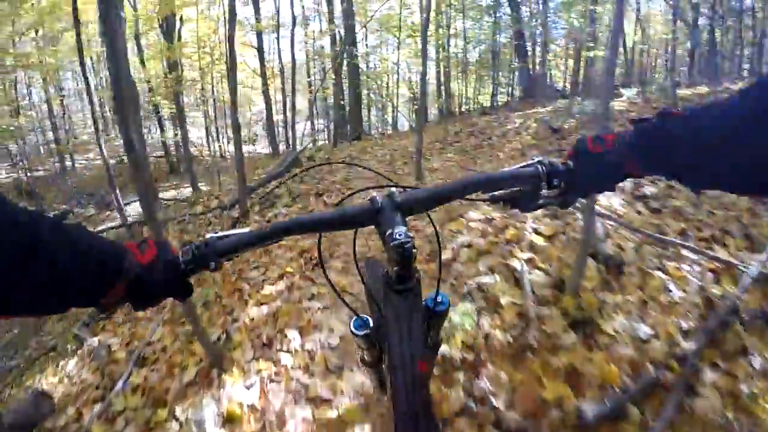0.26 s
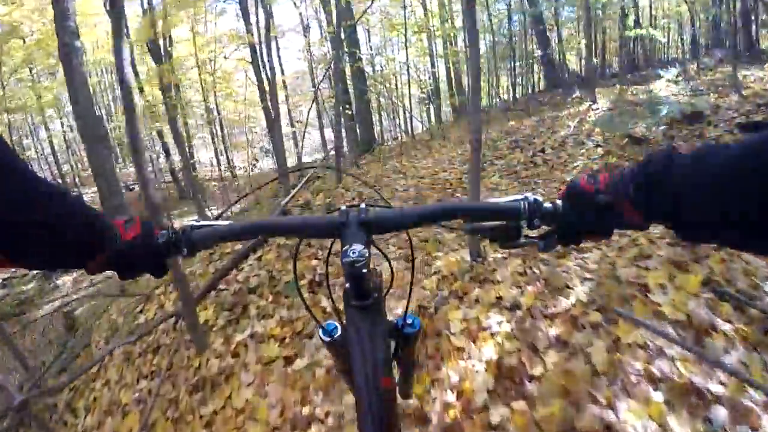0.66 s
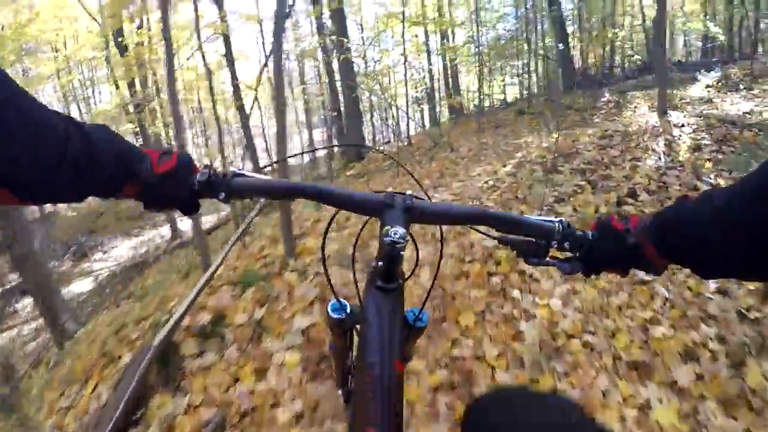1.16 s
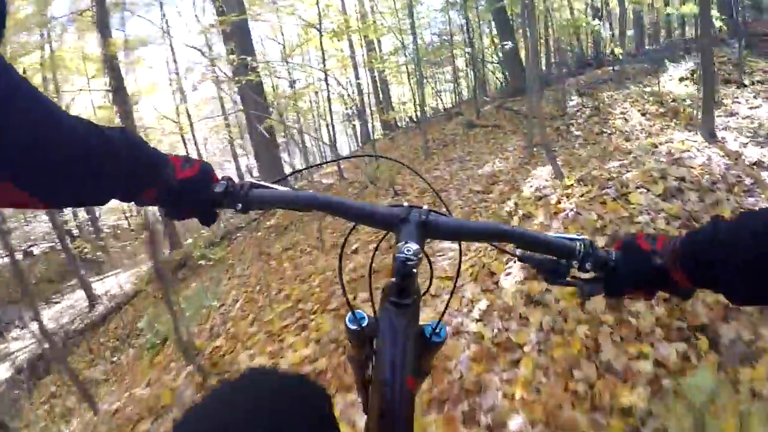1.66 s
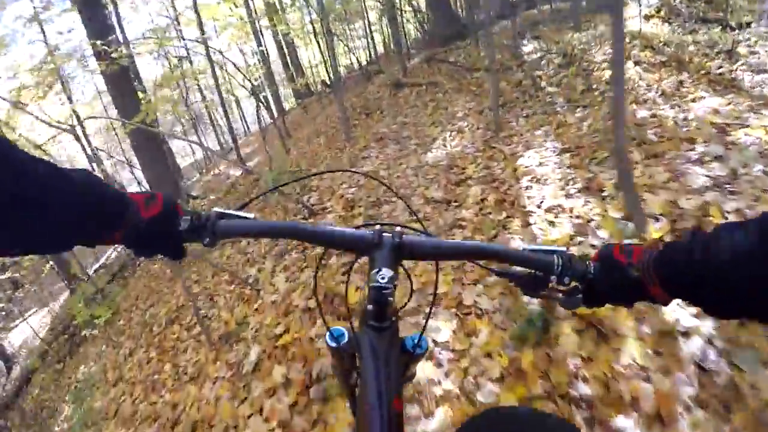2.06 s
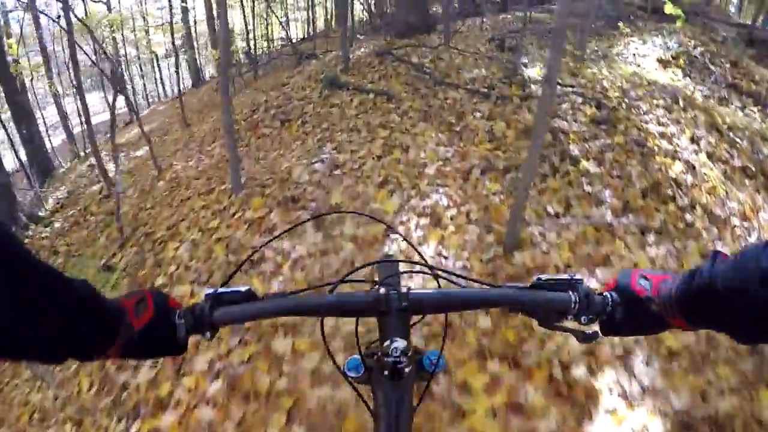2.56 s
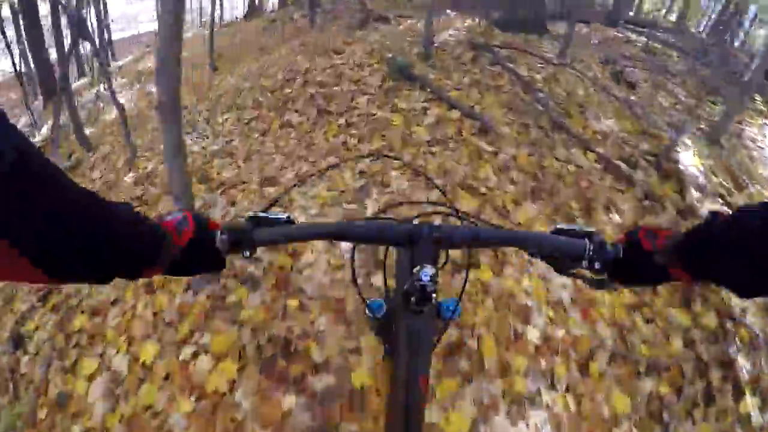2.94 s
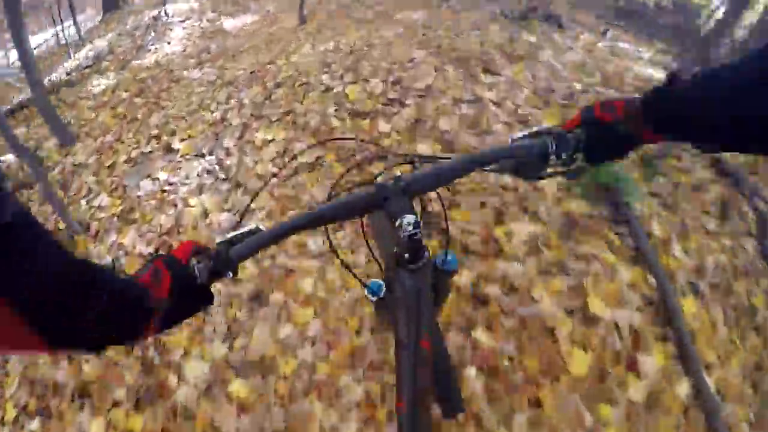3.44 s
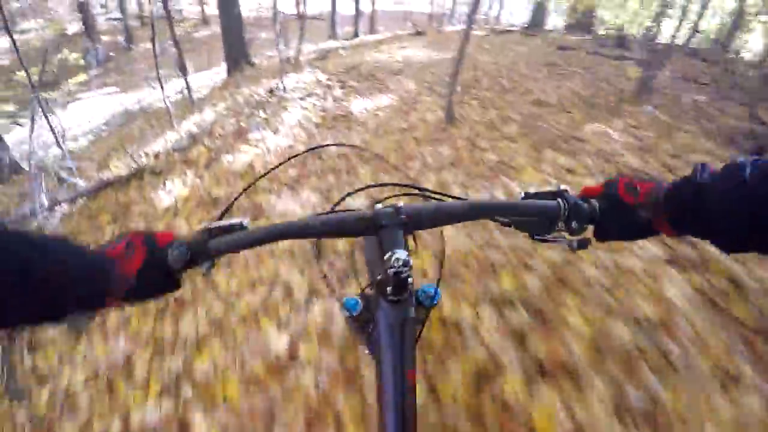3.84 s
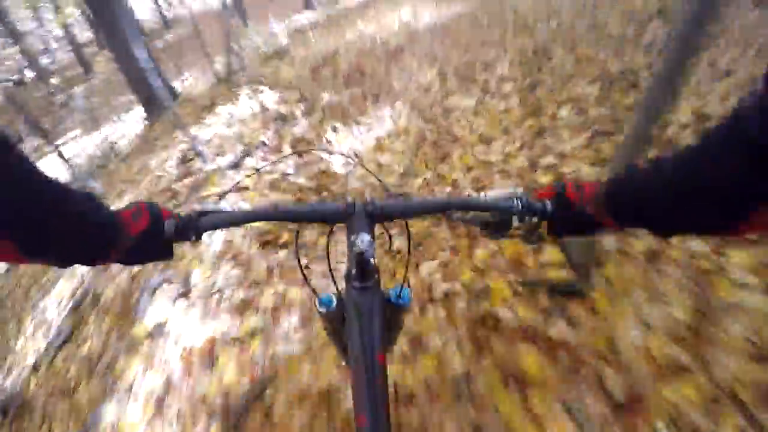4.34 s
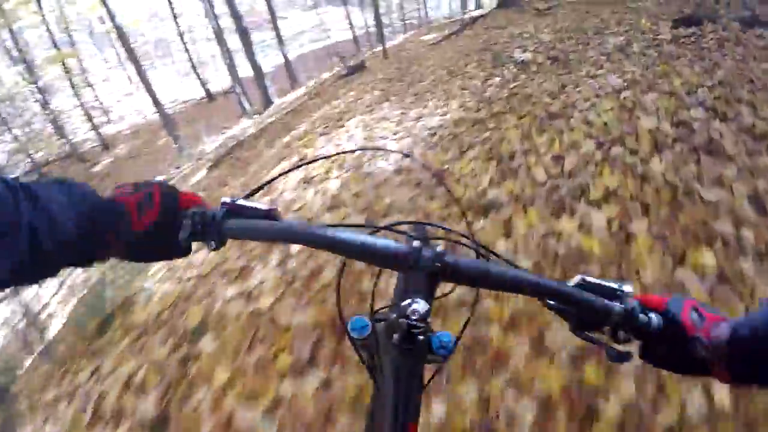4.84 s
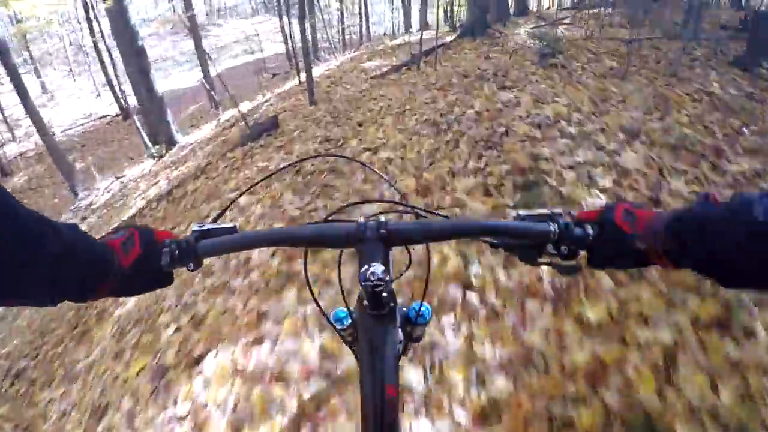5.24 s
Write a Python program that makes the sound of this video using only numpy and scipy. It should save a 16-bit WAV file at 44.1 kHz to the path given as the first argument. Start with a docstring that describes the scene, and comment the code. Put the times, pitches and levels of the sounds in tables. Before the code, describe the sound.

A mountain bike rides fast over dry leaves, tyres crackling and crunching while low buffeting thumps shake the body-worn microphone.

```python
"""Mountain bike over dry leaves

A mountain bike runs fast over dry leaves, heard by a small camera in a case on the rider's chest.
The case shakes and swings as low noise and slow tones; bumps and frame knocks are fading tones.
Leaves are dense tiny cracks over noise, twigs are quick swings with a noisy tail.
The leaf crush, scuffs and splinters are coloured by the ringing case; a faint rush of air lies behind."""
import sys
import numpy as np
from scipy import signal
from scipy.fft import rfft, irfft
from scipy.io import wavfile
from scipy.ndimage import uniform_filter1d

SR = 44100
rng = np.random.default_rng(int(sys.argv[2]) if len(sys.argv) > 2 else 0)


def put_to_file(sound):
    """Save the sound as 16-bit audio at rate SR, in the file named by the first command-line argument."""
    columns = np.atleast_2d(sound).T  # one column per channel
    safe = np.clip(columns, -1, 1)
    whole_steps = np.round(safe * 32767)
    wavfile.write(sys.argv[1], SR, whole_steps.astype(np.int16))


N = 242550


def gain_of(db):
    """Turns decibels into a factor on the waveform."""
    return 10 ** (np.asarray(db) / 20)


def evened(x):
    """Scales a sound to an rms of 1."""
    return x / np.sqrt(np.mean(x ** 2) + 1e-20)


def white_noise():
    """Noise with equal power at every frequency."""
    return rng.standard_normal(N)


def read(points, hz):
    """Reads a spectrum in dB between its points, evenly along pitch."""
    point_hz, level_db = np.transpose(points)
    return np.interp(np.log(hz + 1), np.log(point_hz + 1), level_db)


def curves(rows):
    """Draws each column of a table as a line over the whole scene; the first column is time."""
    times, *columns = np.transpose(rows)
    return [np.interp(np.arange(N) / SR, times, column) for column in columns]


def add(mix, start_s, sound):
    """Lays a short sound into the mix, cut off at the end of the scene."""
    part = mix[round(start_s * SR):][:len(sound)]
    part += sound[:len(part)]


def band_passed(x, low_hz, high_hz):
    """Keeps mostly the sound between two frequencies."""
    return signal.sosfilt(signal.butter(2, [low_hz, high_hz], "band", fs=SR, output="sos"), x)


def low_passed(x, hz):
    """Keeps the sound below a frequency without delaying it."""
    return signal.sosfiltfilt(signal.butter(3, hz, fs=SR, output="sos"), x)


def toned(x, points):
    """Shapes a noise by a spectrum that is silent outside its ends."""
    hz = np.fft.rfftfreq(N, 1 / SR)
    inside = (hz >= points[0][0]) & (hz <= points[-1][0])
    return evened(irfft(rfft(x) * gain_of(read(points, hz)) * inside, N))


def steadied(x, seconds, share):
    """Divides out a share of the slow chance swell of a noise."""
    width = round(seconds * SR)
    power = uniform_filter1d(uniform_filter1d(x ** 2, width), width)
    floor = 0.0084 * power.mean()  # keeps quiet gaps from being blown up
    return evened(x / (abs(power) + floor) ** (share / 2))


def flutter(hz):
    """Slow chance with rms 1: straight lines between random values, hz values a second."""
    steps = rng.standard_normal(round(N / SR * hz) + 2)
    return evened(np.interp(np.arange(N) / SR * hz, np.arange(len(steps)), steps))


def rise_and_fall(t, rise_s):
    """A swell that peaks at 1 after rise_s seconds and then dies away."""
    return t / rise_s * np.exp(1 - t / rise_s)


def following(change_db, share, average_db):
    """Gain of a layer that takes a share of a change in dB around its level on average ground."""
    return gain_of(average_db + share * change_db)


def jolting():
    """The case swings on its strap; jolts swell and fade as bells, and the strap checks wide swings."""
    # jolts that set the case swinging, before the strap checks them:
    # (time of the peak [s], level [dB], swing rate [Hz], length between the points at 1/e of the peak [s])
    jolts = [(0.147, -12.5, 21.3, 0.096), (.26, -19.5, 26.7, 0.05), (0.509, -5, 20.8, 0.042),
             (0.649, -17, 24.5, 0.073), (0.802, -10.5, 20.6, .09), (.991, -16.5, 21.7, 0.19),
             (1.154, -8, 21.4, .1), (1.356, -4.5, 23.9, 0.037), (1.529, -14, 26, 0.056),
             (1.68, -12, 20.3, 0.053), (1.865, -14, 21.3, 0.055), (1.955, -14, 19.6, 0.095),
             (2.078, -12.5, 17.4, 0.073), (2.213, -11, 29.8, 0.11), (2.426, -15, 20.9, 0.062),
             (2.605, -14, 19.3, 0.16), (2.817, -16.5, 23.7, 0.092), (2.975, -11, 21.4, 0.097),
             (3.159, -13, 23.7, 0.049), (3.248, -5, 24.2, 0.074), (3.403, -12, 20, 0.12),
             (3.534, -9.5, 19.1, 0.064), (3.609, -8, 20, 0.053), (3.68, -9, 16.5, 0.071),
             (3.761, -6, 24.3, 0.069), (3.899, -9, 18.67, 0.13), (4.007, -6, 18.4, .05),
             (4.081, -7.5, 18.4, .06), (4.24, -4.5, 25, 0.24), (4.368, -0.5, 24.2, 0.061),
             (4.454, -1.5, 21.1, 0.045), (4.577, -1, 20.2, .08), (4.752, -14.5, 16.8, 0.18),
             (4.851, -9.5, 17, 0.12), (4.98, -10.5, 19.4, 0.16), (5.104, -19, 24.4, 0.051),
             (5.231, -17, 17.2, 0.053), (5.385, -7.5, 16.5, 0.086)]
    strap_limit = 0.85  # widest swing, as a waveform value
    t = np.arange(N) / SR
    peak_s, db, hz, length_s = np.transpose(jolts)
    coarse_t = t[::64]  # the bells are slow, so every 64th sample is enough
    bells = np.exp(-2 * (2 * (coarse_t[:, None] - peak_s) / length_s) ** 2)
    power = (gain_of(2 * db) * bells).sum(axis=1)
    size = np.interp(t, coarse_t, np.sqrt(power))
    wandering_hz = np.interp(t, peak_s, hz) * (1 + 0.082 * flutter(20))
    turns = np.cumsum(wandering_hz) / SR + rng.random()
    swing = size * (np.sin(2 * np.pi * turns) + 0.16 * np.cos(4 * np.pi * turns))
    return swing / (1 + (swing / strap_limit) ** 4) ** (1 / 4)


def shaking():
    """Noise for the case's sway and wobble, lumpy thudding from rough ground, tyre drone, frame rattle."""
    # the ride over time: (time [s], ground roughness [dB], frame rattle [dB], tyre drone [dB])
    ground = [(0.0, -57, -41, -50), (0.14, -56, -56, -52.5), (0.66, -56, -63, -59.5),
              (1.05, -56, -59.5, -55), (1.32, -51, -57, -51), (1.45, -55.5, -56.5, -55),
              (1.79, -56.5, -61.5, -56), (2.3, -56, -58.5, -57.5), (2.73, -58, -63, -55),
              (3.12, -53, -60.5, -58), (3.65, -50.5, -57.5, -51), (3.97, -46, -57, -52),
              (4.14, -51, -62, -51), (4.33, -49, -51, -47.5), (4.53, -49.5, -47.5, -44.5),
              (4.72, -54, -59, -52), (4.9, -50.5, -61, -52), (5.2, -50, -54.5, -48), (5.5, -48.5, -56, -51)]
    # spectra of the five layers, each: (frequency [Hz], level [dB])
    sway_tone, wobble_tone, thud_tone = [(4, -40), (8, -6), (13, 4), (20, -3.5), (26, -18.5), (32, -51)], [(16, -25), (22, 10.5), (28, 4), (35, 7),
                                                            (45, -11), (58, -13.5), (70, -39)], [(35, -48), (50, 3.5),
                                                                                (80, -1.5), (125, -6),
                                                                                (160, -15.5), (200, -31)]
    drone_tone, rattle_tone = [(110, -51), (150, -10.5), (190, -4), (280, -2.5), (400, -13.5), (520, -15.5)], [(400, -11.5), (520, -8.5), (620, -0.5), (700, -0.5),
                                                   (780, -5), (1000, -16), (1300, -12)]
    average_ground_db = -55
    ground_db, rattle_db, drone_db = curves(ground)
    rough_db = ground_db - average_ground_db

    # roots and stones jolt the layers together
    lumps, chatter = flutter(25), flutter(60)
    lumpy_thud = white_noise() * gain_of(2.15 * lumps)
    lumpy_drone = white_noise() * gain_of(0.64 * lumps + 2.0 * chatter)
    lumpy_rattle = white_noise() * gain_of(0.82 * lumps + 2.0 * chatter)

    sway = steadied(toned(white_noise(), sway_tone), 0.15, 0.72)
    wobble = steadied(toned(white_noise(), wobble_tone), 0.01, 1.0)
    thud = steadied(toned(lumpy_thud, thud_tone), 0.17, 0.61)
    drone = steadied(toned(lumpy_drone, drone_tone), 0.058, 0.14)
    rattle = steadied(toned(lumpy_rattle, rattle_tone), 0.39, 0.18)

    mix = following(rough_db, share=0.72, average_db=-27) * sway
    mix += following(rough_db, share=0.5, average_db=-25.5) * wobble
    mix += following(rough_db, share=1, average_db=-41) * thud
    return mix + gain_of(drone_db) * drone + gain_of(rattle_db) * rattle


def bumps():
    """Each bump swells and dies within a few low swings that sag in pitch, with sharper thuds above."""
    # bumps under the wheels:
    # (start [s], level of the low swing [dB], pitch it sags to [Hz], upper thud against the low swing [dB])
    bump_list = [(0.029, -26, 104, -9), (0.069, -28.5, 71.5, -13), (0.125, -31.5, 93, -5.5),
                 (0.305, -21.5, 66.6, -7), (0.42, -15, 57.4, -21), (0.603, -18.5, 75, -9),
                 (0.741, -36, 70, 1), (0.771, -15, 48.3, -30), (0.775, -31, 64.6, -3.5),
                 (1.134, -28.5, 80, -11), (1.289, -37, 91.6, -3), (1.161, -28, 50, -30),
                 (1.343, -23, 51.7, -30), (1.339, -32, 72.6, -15), (1.434, -23, 81, -19),
                 (1.479, -27.5, 96, -15), (1.729, -33, 103, -1.5), (1.809, -21, 75, -7),
                 (1.886, -17.5, 83.4, -30), (2.031, -21.5, 78, -24), (2.163, -23, 79, -8.5),
                 (2.262, -33.5, 86.8, -3.5), (2.523, -22.5, 93, -9.5), (2.535, -25, 50.6, -34),
                 (2.88, -34, 99, -4), (2.953, -28, 89.4, -20), (3.088, -23.5, 77.7, -7),
                 (3.203, -18, 49, -33), (3.21, -24, 74.5, -6), (3.489, -24, 87.5, -6),
                 (3.546, -22, 74, -21), (3.601, -17.5, 50.4, -30), (3.71, -28.5, 78.6, -8),
                 (3.812, -26, 75, -4.5), (3.8, -19, 53, -30), (3.916, -18, 49.5, -25),
                 (4.029, -16.5, 49.86, -30), (3.915, -29, 77.3, 3.5), (4.023, -21.5, 80, -3.5),
                 (4.199, -33, 88.83, -6), (4.243, -15, 49.1, -32), (4.338, -15, 47, -30),
                 (4.3, -18, 84.8, -22), (4.371, -23, 71.5, -17), (4.45, -35, 54.9, -19),
                 (4.5, -33, 60.5, -2), (4.545, -31.5, 74, 2.5), (4.581, -36, 55, -8),
                 (4.619, -22, 83.2, -7), (4.906, -26, 89.5, -13), (4.94, -18.5, 52, -26),
                 (5.309, -22, 53, -8), (5.37, -37, 91, -3)]
    rise_turns = 1.08  # the swell peaks after this many turns of the final pitch
    out, t = np.zeros(N), np.arange(8000) / SR
    for start_s, db, hz, upper_db in bump_list:
        rise_s = rise_turns / hz
        swell = rise_and_fall(t, rise_s)
        # the pitch starts half as high again and sinks to hz
        phase = 2 * np.pi * hz * (t + 0.5 * rise_s * (1 - np.exp(-t / rise_s)))
        low = swell ** 3.53 * np.sin(phase)
        upper = swell ** 1.54 * np.sin(1.427 * phase)
        overtone = 0.26 * swell ** 41.0 * np.sin(2.24 * phase)  # the high power makes it very short
        add(out, start_s, gain_of(db) * (low + gain_of(upper_db) * (upper + overtone)))
    return out


def through_case(x):
    """Colours leaf sound by a broad spectrum with the ringing of the case on top, without pre-echo."""
    # broad spectrum of the leaves: (frequency [Hz], level [dB])
    leaf_tone = [(470, -31), (800, -4), (1240, -0.5), (1690, 5), (2380, -1.5), (2800, 3), (3280, -3.5),
                 (4510, 0), (5100, -5.5), (7930, -7.5), (9300, -15.5), (12900, -16.5), (15000, -23)]
    # resonances of the case: (frequency [Hz], width [Hz], boost, or cut if negative [dB])
    case_rings = [(1640, 160, 2), (2198, 280, 6), (2642, 320, 8), (3615, 380, 5), (4820, 110, 3),
                  (5610, 210, 4), (7350, 120, -12), (7500, 390, 0)]
    hz = abs(np.fft.fftfreq(8192, 1 / SR))
    db = read(leaf_tone, hz)
    for ring_hz, width_hz, boost_db in case_rings:
        db = db + boost_db / (1 + (2 * (hz - ring_hz) / width_hz) ** 2)
    log_gain = np.log(gain_of(np.maximum(db, -100)))
    # the Hilbert transform gives the phase that makes the filter answer as early as it can
    taps = np.fft.ifft(np.exp(np.conj(signal.hilbert(log_gain)))).real[:2048]
    return signal.oaconvolve(x, taps)[:N]


def crunches(per_s, fade_s):
    """Chance level with rms 1 that jumps up as a leaf gives way and sinks after it."""
    kicks = (rng.random(N) < per_s / SR) * rng.exponential(1, N)
    fading = signal.lfilter([1], [1, -np.exp(-1 / (fade_s * SR))], kicks)
    level = np.log(0.37 + fading)
    return evened(level - level.mean())


def cracks(base_per_s, spread_db, cycles):
    """Tiny cracks of many pitches, each in its own clumps; the high ones are denser and more alike."""
    out = np.zeros(N)
    for hz in np.geomspace(900, 14000, num=24):
        t = np.arange(round(3 * cycles / hz * SR) + 2) / SR
        grain = np.sin(2 * np.pi * hz * t) * np.exp(-t * hz / cycles * 2)
        density = max(1, hz / 3500) ** 1.5
        struck = rng.random(N) < base_per_s / 24 / SR * density
        pitch_spread_db = spread_db * min(1, (4000 / hz) ** 0.036)
        size = gain_of(pitch_spread_db * np.minimum(rng.exponential(1, struck.sum()), 5))
        hits = np.zeros(N)
        hits[struck] = size * rng.choice([-1, 1], len(size))
        clumps = gain_of(2.2 * min(1, 5000 / hz) * flutter(30))
        out += hz * signal.oaconvolve(hits * clumps, evened(grain))[:N]
    # flatten the broad spectrum so that a later filter sets the colour
    hz = np.fft.rfftfreq(N, 1 / SR)
    spectrum = rfft(out)
    power = uniform_filter1d(abs(spectrum) ** 2, 3000)
    return evened(irfft(spectrum / np.sqrt(power) * (hz > 400), N))


def leaves():
    """The tyres crush leaves: dense cracks over a noisy rustle, in four ranges that swell apart."""
    # levels under the tyres: (time [s], crushed leaves 2.3-3.2 kHz [dB], heavy litter below that [dB],
    # brittle leaves 3.2-5 kHz [dB], fizz above that [dB])
    tyres = [(0.0, -56, -45, -50.5, -57), (0.17, -52.5, -50, -47, -55.5), (0.29, -52, -48, -50, -55),
             (0.5, -62, -52, -56, -61.5), (0.67, -61.5, -55, -58, -62), (0.98, -61, -50, -54, -60.5),
             (1.12, -65, -50, -54.5, -57.5), (1.3, -68, -47, -52, -59), (1.45, -59, -53.5, -54.5, -57.5),
             (1.71, -61, -49.5, -50, -55.5), (1.85, -58, -53.5, -50, -57.5), (2.02, -63, -51, -54, -58.5),
             (2.2, -54.5, -51, -54.5, -58.5), (2.51, -52, -50, -48, -57), (2.75, -56.5, -51, -52.5, -59),
             (3.12, -51.5, -53, -54, -59.5), (3.28, -58, -48.5, -53, -59), (3.35, -52, -45.5, -56, -56),
             (3.41, -44, -48, -48, -53.5), (3.57, -45, -46, -43, -53.5), (3.74, -45, -44, -43.5, -51.5),
             (3.91, -43, -46.5, -43.5, -50), (4.06, -45, -47, -48.5, -52.5), (4.17, -52, -46, -52.5, -54),
             (4.27, -72, -42, -44, -53), (4.44, -44, -44.5, -44, -50.5), (4.58, -48, -40.5, -44, -48.5),
             (4.73, -49, -47, -43, -51.5), (4.9, -44.5, -51, -50.5, -53.5), (5.13, -57, -48, -47.5, -53),
             (5.27, -42, -48.5, -44, -51.5), (5.5, -48, -48, -52, -51.5)]
    body_db, heavy_db, brittle_db, fizz_db = curves(tyres)
    clumps = gain_of(0.2 * flutter(24.6) + 1.78 * crunches(per_s=45, fade_s=0.014))
    rustle = 0.66 * cracks(base_per_s=2600, spread_db=2.0, cycles=4.8) + 0.59 * white_noise()
    crush = through_case(clumps * rustle)
    # differences between low-passed copies give the ranges
    below_2300, below_3200, below_5000 = (low_passed(crush, hz) for hz in (2300, 3200, 5000))
    heavy = steadied(below_2300, 0.13, 0.38)
    body = steadied(below_3200 - below_2300, 0.028, 0.52)
    brittle = steadied(below_5000 - below_3200, 0.074, 0.31)
    fizz = steadied(crush - below_5000, 0.056, 0.4)
    lower = gain_of(heavy_db) * heavy + gain_of(body_db) * body
    return lower + gain_of(brittle_db) * brittle + gain_of(fizz_db) * fizz


def scuffs():
    """Short swells of coarse crackle around one pitch, quick to rise, heard through the case."""
    # coarse scuffs through heaps of litter:
    # (start [s], level before the swell shapes it [dB], middle pitch [Hz], length [s])
    scuff_list = [(0.178, -46.5, 1840, 0.063), (0.724, -46, 2740, 0.024), (0.779, -44, 2120, 0.035),
                  (0.917, -55, 2720, 0.16), (1.082, -54, 4230, 0.16), (1.208, -43, 2080, 0.069),
                  (1.27, -47, 1350, 0.058), (1.307, -54, 920, 0.037), (1.715, -42, 1200, 0.034),
                  (1.385, -44.5, 2070, 0.13), (1.498, -49, 3400, 0.22), (1.618, -58, 4850, 0.17),
                  (1.672, -44, 2010, 0.16), (1.89, -45.5, 1840, 0.053), (2.867, -40.5, 2209, 0.024),
                  (3.201, -37.5, 2500, 0.023), (3.293, -53, 1700, 0.019), (3.35, -41, 3870, 0.041),
                  (3.407, -38, 3660, 0.063), (3.42, -47, 6300, 0.027), (3.474, -43.5, 1170, 0.043),
                  (3.565, -35, 3077, 0.076), (3.664, -37.5, 2700, 0.032), (4.026, -39, 4020, 0.074),
                  (4.045, -49, 9516, 0.038), (0.911, -50.5, 1020, 0.038), (5.076, -42, 2296, 0.04),
                  (4.217, -38, 2300, 0.069), (4.272, -36.5, 1200, 0.026), (4.323, -39, 1760, 0.032),
                  (4.327, -38, 4240, 0.022), (4.34, -39.5, 2670, 0.071), (4.38, -32, 1353, 0.024),
                  (4.506, -33.5, 1940, 0.032), (4.562, -40, 1920, 0.04), (4.508, -39.5, 5940, 0.028),
                  (4.539, -39, 4400, 0.023), (4.607, -37, 2890, 0.033), (5.119, -38, 2280, 0.052),
                  (5.492, -36, 2995, 0.024)]
    out = np.zeros(N)
    coarse = through_case(cracks(base_per_s=1500, spread_db=2.5, cycles=1.8))
    for start_s, db, hz, length_s in scuff_list:
        spread = 1 + 0.32 * (0.043 / length_s) ** 0.72  # long brushes keep to a narrower range
        piece = coarse[round(start_s * SR):][:round(length_s * SR)]
        crackle = evened(band_passed(piece, hz / spread, hz * spread))
        swell = np.sin(np.pi * np.linspace(0, 1, len(crackle)) ** 0.8) ** 0.61
        add(out, start_s, gain_of(db) * crackle * swell)
    return out


def snaps():
    """Quick swings near the twig's pitch, a rough tail, and bright splinters that ring the case."""
    # twigs and stiff leaves that snap:
    # (start [s], overall gain [dB], pitch [Hz], splinters against the overall gain [dB])
    snap_list = [(0.0138, -17.5, 2010, -20), (0.033, -26, 2670, -24), (0.175, -32, 4600, -16),
                 (0.201, -23.5, 1600, -16), (0.385, -26, 2000, -21), (0.4462, -24, 1790, -17.5),
                 (0.674, -41, 2640, -20), (0.7317, -32, 2650, -11), (0.784, -26.5, 2090, -16.5),
                 (0.8345, -33, 2150, -14), (0.9398, -37, 2690, -21), (1.221, -27, 1760, -19),
                 (1.2424, -18.5, 1800, -31), (1.2435, -25, 2800, -24), (1.251, -10, 2020, -30),
                 (1.2517, -25, 3100, -20), (1.2684, -31, 2100, -14), (1.2812, -30, 2900, -18),
                 (1.7296, -28, 2080, -36), (1.8771, -36, 1710, -18), (1.911, -22.5, 1760, -16),
                 (2.2408, -33, 2700, -21), (2.8402, -31, 2620, -20), (2.879, -25, 2700, -18),
                 (2.9513, -31, 1920, -30), (2.9555, -15, 2080, -42), (2.955, -26, 2640, -30),
                 (2.975, -31, 2840, -29), (3.0285, -25, 1500, -33), (3.0809, -34, 2730, -22),
                 (3.211, -20.5, 2610, -20), (3.252, -37, 4300, -15), (3.2933, -23.5, 1700, -23),
                 (3.321, -34, 4400, -14), (3.3528, -31, 3700, -15), (3.364, -30, 3900, -6.5),
                 (3.373, -26, 3630, -13), (3.416, -33, 1620, 1.5), (3.425, -15, 3730, -29),
                 (3.438, -17.5, 2560, -33), (3.484, -25, 1720, -29), (3.495, -29, 4500, -12),
                 (3.506, -23, 2630, -23), (3.5352, -23, 2630, -24), (3.5523, -24, 2710, -17),
                 (3.561, -16.5, 2567, -33), (3.5899, -15, 2660, -39), (3.5899, -19, 4390, -35),
                 (3.604, -25, 3620, -19), (3.6095, -30, 4800, -14), (3.625, -26, 2700, -22),
                 (3.677, -19, 2750, -38), (3.7134, -26, 2720, -22), (3.7436, -21, 2748, -22),
                 (3.7945, -27, 2790, -19), (3.9997, -29, 2690, -22), (4.0304, -31, 3950, -16),
                 (4.071, -32, 4986, -3), (4.206, -34, 5200, -8), (4.2237, -17.5, 2640, -19),
                 (4.249, -20.5, 3520, -27), (4.2864, -18.5, 2670, -17), (4.2935, -27, 1300, -26),
                 (4.3283, -31, 2970, -20), (4.339, -18.5, 2800, -25), (4.3842, -17.5, 2580, -21),
                 (4.391, -28, 1390, -26), (4.397, -27, 2100, -22), (4.405, -30, 2700, -24),
                 (4.431, -25, 2609, -21), (4.4309, -27, 4300, -22), (4.4432, -13.5, 1830, -24),
                 (4.456, -25, 2787, -12), (4.466, -22, 3840, -16), (4.479, -26, 4000, -12),
                 (4.493, -23, 2710, -24), (4.507, -26, 2893, -8), (4.518, -16.5, 1770, -22),
                 (4.518, -23.5, 6000, -14), (4.524, -16, 2150, -37), (4.5265, -21, 1510, -30),
                 (4.534, -24, 2600, -20), (4.547, -32, 2700, -18), (4.554, -31, 2600, -14),
                 (4.588, -26, 1703, -22), (4.568, -25, 3670, -15), (4.6232, -19, 2940, -23),
                 (4.631, -38, 4800, -12), (4.664, -27, 3700, -25), (4.6853, -23.5, 2090, -20),
                 (4.7707, -42, 2740, -20), (4.8759, -25, 2520, -22), (5.0085, -30, 2851, -22),
                 (5.082, -25, 2700, -26), (5.1019, -24.5, 2020, -22), (5.137, -22, 2500, -27),
                 (5.1753, -25, 2100, -24), (5.237, -30, 4510, -10), (5.247, -37, 4500, -6),
                 (5.2628, -20.5, 1990, -28), (5.295, -24, 2486, -13), (5.315, -30, 2700, -18),
                 (5.3403, -29, 2648, -24), (5.3882, -8.5, 2800, -20), (5.3908, -22, 3000, -23),
                 (5.3927, -16, 3009, -16)]
    swing_s, ring_s = 0.001, 0.004  # peak of the first swell, fade of the ringing to 1/e
    tail_t60_s, spit_t60_s = 0.067, 0.02  # times to fade by 60 dB
    out, t = np.zeros(N), np.arange(3000) / SR
    noise = rng.standard_normal((len(snap_list), 2, len(t)))
    splinters = band_passed(through_case(white_noise()), 4200, 13000)
    onset = 1 - np.exp(-t / swing_s)
    swell = rise_and_fall(t, swing_s) ** 2 + 0.24 * onset * np.exp(-t / ring_s)
    for (start_s, db, hz, treble_db), (tear, puff) in zip(snap_list, noise):
        wood = evened(band_passed(tear, 0.7 * hz, 1.45 * hz))
        swing = swell * (0.44 * np.sin(2 * np.pi * hz * t) + 0.087 * wood)
        tail = 0.053 * wood * onset * gain_of(-60 * t / tail_t60_s)
        ringing = evened(splinters[round(start_s * SR):][:len(t)])
        spit = evened(ringing + 0.12 * np.diff(puff, prepend=0))  # differences brighten the noise
        bright = gain_of(treble_db - 60 * t / spit_t60_s) * spit
        add(out, start_s, gain_of(db) * (swing + tail + bright))
    return out


def knocks():
    """Each blow rings the frame's tones; harder blows favour the upper ones, which arrive first."""
    # knocks of the frame: (time [s], overall gain [dB], hardness as tilt around 700 Hz [dB per octave])
    blows = [(0.303, -48, 3), (0.533, -45.5, -6), (0.604, -29, 0), (1.061, -57.5, -18.5),
             (1.334, -41.5, 1.5), (1.467, -45.5, 10.5), (1.808, -39, -4.5), (2.031, -30.5, -1),
             (2.184, -46.5, 0), (2.529, -50, -12), (3.474, -43, -4), (3.923, -45, 0), (4.289, -42, -10.5),
             (4.369, -46, -14.5), (4.514, -48, -15), (4.552, -45, -14.5)]
    # tones of the frame: (frequency [Hz], level [dB], time to fade by 60 dB [s])
    frame = [(298, 4, 0.026), (419, -5, 0.035), (481, -15.5, 0.26), (691, 1.5, 0.067), (930, -9, 0.0075),
             (1100, 7.5, 0.015), (1350, 5, 0.017), (1780, -8, 0.014)]
    out, t = np.zeros(N), np.arange(12000) / SR
    for start_s, db, tilt_db in blows:
        for hz, level_db, t60_s in frame:
            hardness_db = tilt_db * np.log2(hz / 700)
            fade = gain_of(db + level_db + hardness_db - 60 * t / t60_s)
            onset = 1 - np.exp(-t * hz / 0.28)
            delay_s = 0.98 / hz  # about one turn of the tone
            add(out, start_s + delay_s, fade * onset * np.sin(2 * np.pi * hz * t))
    return out


def rush_of_air():
    """A faint steady hiss of moving air: noise shaped by a fixed spectrum."""
    # spectrum of the air: (frequency [Hz], level [dB])
    air_tone = [(3000, -26), (6000, -2), (10000, 9), (15500, -45)]
    air_db = -72
    return gain_of(air_db) * toned(white_noise(), air_tone)


def scene():
    """Adds up all the sources in one channel."""
    low = jolting() + shaking() + bumps()
    crisp = leaves() + scuffs() + snaps()
    return (low + crisp + knocks() + rush_of_air())[None]


def record(dry):
    """Removes the treble above a sharp upper limit."""
    edge_hz = 15120
    taps = signal.firwin(1023, edge_hz, window=("kaiser", 9), fs=SR)
    return signal.oaconvolve(dry, taps[None], "same")


dry = scene()
out = record(dry)
put_to_file(out)
```